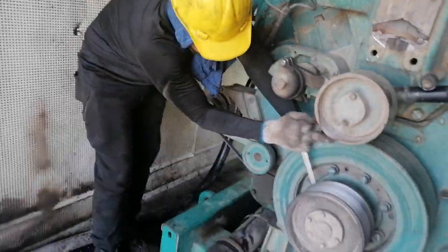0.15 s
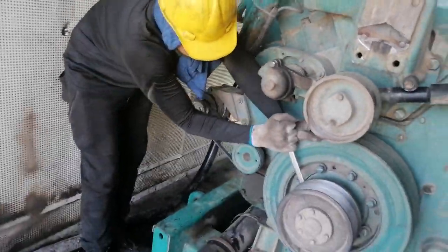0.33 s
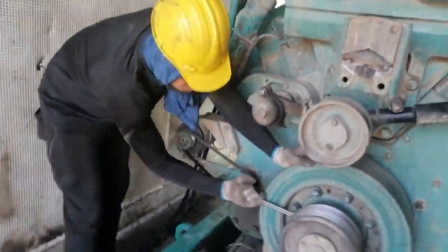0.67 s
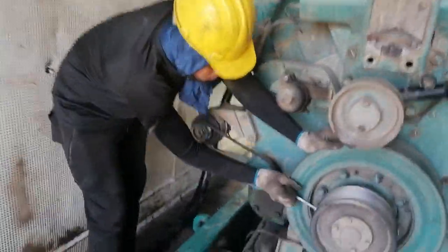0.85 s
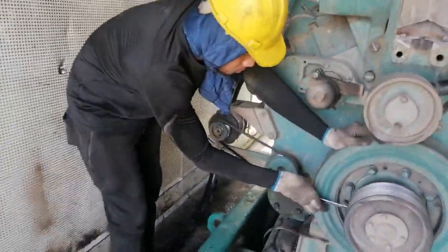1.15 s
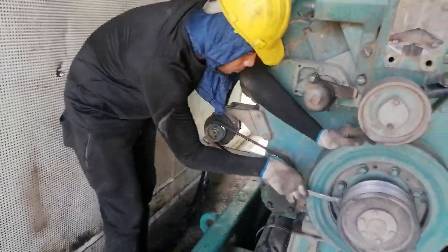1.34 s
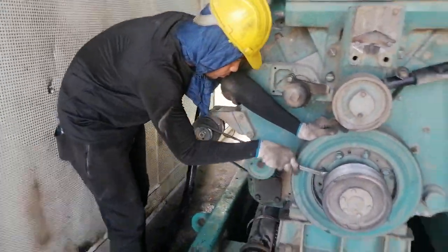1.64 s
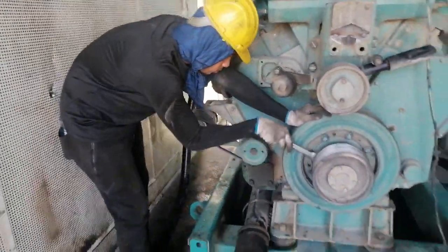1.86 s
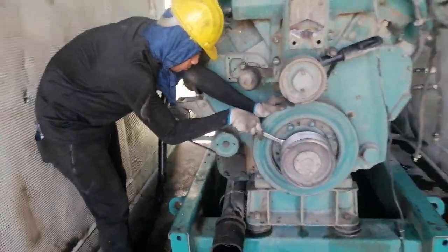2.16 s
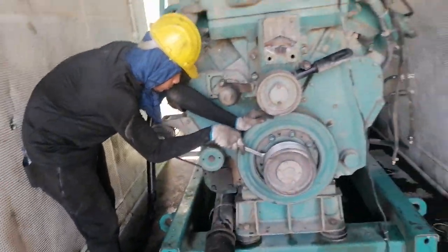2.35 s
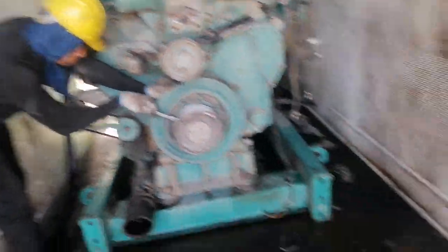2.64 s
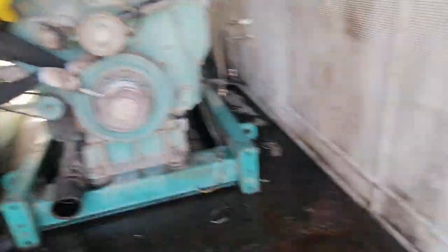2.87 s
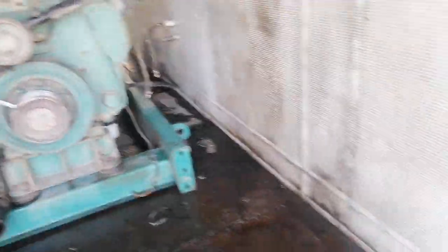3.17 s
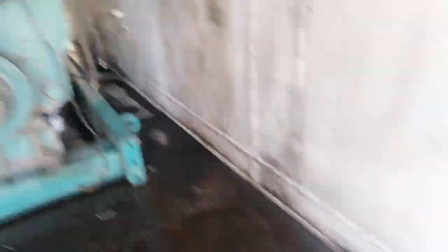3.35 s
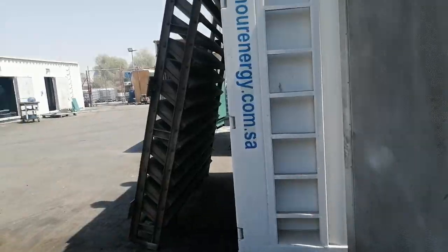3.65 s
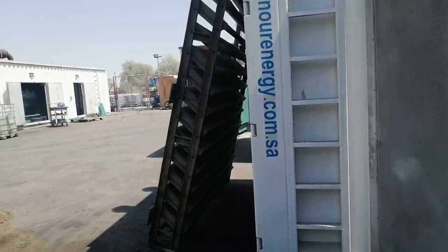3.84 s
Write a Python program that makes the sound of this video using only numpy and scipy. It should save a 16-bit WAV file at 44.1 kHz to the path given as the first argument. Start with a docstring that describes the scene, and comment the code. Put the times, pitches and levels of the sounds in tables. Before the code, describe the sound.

A spanner slips and clinks sharply on a large engine, then a louder windy yard cuts in.

```python
"""A spanner slips and clinks on a large idle engine: blows and a skid set its ringing tones going.
It happens inside a steel enclosure with yard noise (shaped noise), a low rumble and a wavering hum.
Then the place jumps outdoors: louder machinery, hiss, and wind on the microphone. A tick and rustles are added.
Only the left microphone works; the right channel holds its own faint noise.
A limiter turns both channels down after loud peaks."""
import sys
import numpy as np
from scipy import signal
from scipy.fft import rfft, irfft
from scipy.io import wavfile

SR = 44100
rng = np.random.default_rng(int(sys.argv[2]) if len(sys.argv) > 2 else 0)


def put_to_file(sound):
    """Save the sound as 16-bit audio at rate SR, in the file named by the first command-line argument."""
    columns = np.atleast_2d(sound).T  # one column per channel
    safe = np.clip(columns, -1, 1)
    whole_steps = np.round(safe * 32767)
    wavfile.write(sys.argv[1], SR, whole_steps.astype(np.int16))


N = 176400
TIME = np.arange(N) / SR   # seconds
OUTDOORS_START_S, CROSSFADE_S = 3.356, .003

# Drone of the yard heard inside. Each row: time in seconds, level in dB.
INSIDE_LEVEL = [(0, -37), (.3, -38), (.6, -35.5), (.84, -38.5), (.89, -44.5), (1.3, -42), (1.8, -41.5),
                (2.3, -44), (2.8, -44.5), (3.35, -45)]
# Colour of that drone. Each row: frequency in Hz, relative strength per Hz in dB.
INSIDE_COLOUR = [(12, -52), (20, -4.5), (54, -16.5), (124, -14.5), (259, -2), (280, -3), (312, -6),
                 (348, -10), (393, -8.5), (527, -13.5), (597, -15.5), (800, -20.5), (1040, -55),
                 (1760, -120)]
# Broad tones of the enclosure. Each row: frequency in Hz, filter width in Hz, level over the drone in dB.
INSIDE_TONES = [(89.2, 6.3, -14.5), (181.55, 15.5, -4.5), (351.2, 19.3, -6), (240, 30, -7),
                (1041.7, 17, -22.5)]
# Upper part of the yard noise inside. Each row: time in seconds, level in dB.
AIR_LEVEL = [(0, -47.5), (.3, -49), (.6, -48.5), (.84, -49), (.89, -56), (1.3, -56.5), (1.8, -56.5),
             (2.3, -57), (2.8, -55.5), (3.35, -56)]
# Colour of that upper part. Each row: frequency in Hz, relative strength per Hz in dB.
AIR_COLOUR = [(470, -25), (800, -0.5), (1030, -5), (1250, -10), (1420, -5.5), (1530, -12), (1750, -8.5),
              (1930, -12), (2300, -14.5), (2700, -11.5), (3020, -10.5), (4070, -24), (5220, -18),
              (7670, -23), (8680, -15.5), (10900, -32.5), (13700, -41.5), (14600, -37), (15600, -44)]
# Low rumble inside. Each row: time in seconds, level in dB.
RUMBLE_LEVEL = [(0, -43), (.5, -50.5), (.84, -55), (.89, -56), (1.3, -55.5), (1.7, -51.5), (2.1, -52.5),
                (2.5, -62), (2.9, -58), (3.35, -58)]
RUMBLE_HZ = (22, 133.5)
# The hum swells and sinks. Each row: time in seconds, level in dB before it is doubled.
HUM_LEVEL = [(0.8, -50.5), (0.82, -43), (0.91, -62), (0.97, -42.5), (0.99, -51.5), (1.12, -41),
             (1.23, -44.5), (1.3, -33), (1.37, -38.5), (1.4, -48), (1.48, -32.5), (1.54, -35.5),
             (1.63, -42.5), (1.72, -33.5), (1.86, -39), (1.94, -33), (1.99, -42.5), (2.09, -33),
             (2.13, -38.5), (2.21, -50), (2.33, -35), (2.42, -49), (2.45, -39), (2.51, -37.5),
             (2.57, -52.5), (2.65, -43.5), (2.72, -47), (2.74, -55), (2.83, -51), (2.87, -71), (2.9, -74),
             (2.92, -52), (3.01, -68), (3.04, -68), (3.08, -48), (3.11, -49), (3.14, -68), (3.19, -67),
             (3.21, -49), (3.26, -45), (3.31, -52), (3.35, -68)]
HUM_HZ, HUM_WANDER_HZ, HUM_FLUTTER_DB = 270, 1.5, .9   # middle pitch, then typical drift of pitch and level

# Base level of the roar outdoors. Each row: time in seconds, level in dB.
OUTSIDE_LEVEL = [(3.37, -46.5), (3.386, -46.5), (3.5, -46.5), (3.66, -46), (3.67, -49), (3.928, -48),
                 (3.97, -49.5)]
# Colour of the roar. Each row: frequency in Hz, relative strength per Hz in dB.
OUTSIDE_COLOUR = [(88, -11), (150, -4), (252, -11.5), (285, -4), (345, -2), (417, -16), (465, -31),
                  (672, -10.5), (895, -18.5), (1050, -15), (1260, -24.5), (1740, -20.5), (1890, -31),
                  (2110, -21), (2630, -26.5), (3360, -28), (3900, -43), (5070, -74), (8580, -120)]
OUTSIDE_OVER_DB = 17.5   # whole band of roar over the base level
# Machine tones outdoors. Each row: frequency in Hz, filter width in Hz, level over the base level in dB.
OUTSIDE_TONES = [(347.1, 10.6, 17), (391, 34, 8.5), (268, 24, 7.5), (768.6, 16, 2.5), (1027, 32, 2),
                 (972, 27, -2.5), (1131, 35, -1), (2107, 11, -5.5), (670, 39, 1.5)]
# Hiss outdoors. Each row: time in seconds, level in dB.
HISS_LEVEL = [(3.36, -48.5), (3.4, -47.5), (3.44, -48.5), (3.52, -46.5), (3.6, -48), (3.7, -51.5),
              (3.82, -52), (3.9, -52.5), (3.96, -52.5)]
# Colour of the hiss. Each row: frequency in Hz, relative strength per Hz in dB.
HISS_COLOUR = [(2500, -33), (3800, -6.5), (5100, -0.5), (6300, -6.5), (7600, -5.5), (8700, -1), (9800, -8),
               (11000, -20.5), (13000, -28), (15600, -45)]
# Wind on the microphone. Each row: time in seconds, level in dB before it is doubled.
WIND_LEVEL = [(3.37, -51), (3.424, -30), (3.448, -21), (3.502, -25.5), (3.544, -28.5), (3.68, -31.5),
              (3.694, -34.5), (3.832, -36.5), (3.9, -33), (3.92, -24.5), (3.956, -24.5), (4.0, -23.5)]
# Colour of the wind. Each row: frequency in Hz, relative strength per Hz in dB.
WIND_COLOUR = [(20, 5), (50, 2), (130, 4.5), (250, -0.5), (500, -10.5), (900, -58)]
WIND_LUMPS_DB = 1.5
# Strong wind brightens: band, its level when the wind table reads GUST_AT_DB, dB gained per dB of wind
GUST_HZ, GUST_DB, GUST_AT_DB, GUST_SLOPE = (250, 750), -36, -27.5, 1.6
# Single thumps of wind. Each row: start in seconds, starting height in dB, frequency in Hz.
BUFFETS = [(3.448, -10, 150), (3.543, -15, 150), (3.586, -16, 160), (3.629, -15, 140), (3.698, -14, 60),
           (3.74, -17, 70), (3.924, -14, 120), (3.96, -11, 140)]
BUFFET_CYCLES = 4.5   # cycles until a thump has died by 60 dB

# Soft rustles in the treble. Each row: middle in seconds, length in seconds, level in dB.
RUSTLES = [(.08, .06, -71), (0.222, .04, -72), (.61, .08, -66), (1.165, .05, -71), (2.238, .09, -70),
           (2.776, 0.042, -81), (3.59, 0.069, -62)]
RUSTLE_HZ, RUSTLE_FLICKER_DB = (7500, 13000), 2.0
TICK_S, TICK_DB = 2.854, -38.5   # a small dry tick; its rows are added to this level
# Tones of the tick. Each row: frequency in Hz, relative strength in dB, seconds to die by 60 dB.
TICK_TONES = [(5440, -13, 0.014), (6900, -7, .025), (8550, -1, .025), (8860, -2, 0.061), (8950, 1, .03),
              (9350, -6, .02), (12000, -24, .02)]

# Ringing tones (modes) of the spanner: the frequency of each in Hz.
SPANNER_HZ = [1140, 1320, 2435, 3700, 4180, 4330, 4800, 5150, 5549, 5660, 6210, 6345, 6378, 6540, 6800,
              7800, 8737, 9175, 9400, 9680, 10140, 10565, 10990, 12022, 13088, 13650, 14550, 15110]
# The same modes in order. Each row: seconds to die by 60 dB, then strength in dB when struck at the jaw,
# at the neck, at the shank, and when skidding.
SPANNER_MODES = [(0.048, -29, -11.5, -48, -3), (0.051, -21, -25, -49.5, -14), (0.038, -23, 5, -44, -7),
                 (0.04, -24, -17, -29, -18), (0.12, -18, -35, -12, -7.5), (.06, -20, -35, -28, -14),
                 (.04, -21, -40, -34, -17), (.04, -18, -35, -28, -20), (0.074, -10, -26, 5.5, -16),
                 (.16, -29, -40, -12, -30), (.05, -15, -40, -24, -16), (0.051, -21, -33, -36, -10),
                 (0.1, 5.5, -33, -10, -14), (0.054, -5, -39, -28, -20), (0.11, -15, -41, -28, -21),
                 (0.067, -33, -38, -12, -25), (0.11, -4.5, -34, -12, -3.5), (0.1, -9.5, -23, -18, -2),
                 (.06, -22, -30, -24, -14), (.07, -23, -32, -27, -18), (0.14, -13.5, -13, -18.5, -19),
                 (.12, -24, -31, -38, -27), (.06, -38, -31, -33, -25), (.1, -19, -16, -34, -19),
                 (0.079, -45, -7, -23, -28), (.05, -42, -30, -44, -40), (.07, -43, -35, -48, -50),
                 (.1, -42, -25, -50, -50)]
PLACES = ["jaw", "neck", "shank", "skid"]
# Blows. Each row: start in seconds, strength in dB, place struck, level of its crack in dB.
BLOWS = [(.783, -62, "shank", -45), (0.7972, -50, "shank", -52), (0.8056, -30.5, "neck", -48),
         (0.83, -43, "neck", -48), (.838, -38, "skid", -50), (0.8489, -15, "jaw", -23.5),
         (.852, -34, "neck", -51), (1.2, -60.5, "jaw", -58), (1.245, -62, "neck", -73),
         (1.282, -58, "skid", -68), (1.385, -62, "neck", -72), (1.557, -40.5, "shank", -50)]
# The jaw skids before the loud blow: start and end, strength at each, average clicks per second
SLIP_S, SLIP_DB, SLIP_PER_S = (.811, .848), (-48, -44), 1300
CRACK_HZ, CRACK_T60_S = (3780, 9050), 0.048
SWELL_T60_S = 0.01   # a ring swells briefly as the near walls answer
WALLS_DB, WALLS_T60_S, WALLS_START_S = -11, .1, .003   # steel walls scatter the spanner's sound

# Colour of the right channel's noise. Each row: frequency in Hz, relative strength per Hz in dB.
RIGHT_COLOUR = [(20, -0.5), (60, -4), (200, -12), (700, -21.5), (2000, -30), (3000, -29), (4000, -40),
                (5300, -32.5), (7500, -42), (15000, -35)]
RIGHT_DB = -75

SENSE_HZ = 90   # the limiter hears little below this
LIMIT_DB, LIMIT_SHARE = -15.5, 0.58   # threshold, and share of the excess that is taken off
RELEASE_DB_PER_S, ATTACK_S = 31.5, 0.0054   # fall of the held peak level, and smoothing of the ducking
PEAK_TOP = .5   # after the limiter, peaks are rounded toward this height
CUTOFF_HZ = 15800   # the top is 60 dB down from here up


def from_db(db):
    """Turn decibels into a plain multiplier."""
    return 10 ** (np.asarray(db) / 20)


def rms_one(x):
    """Scale a signal to an average strength (rms) of 1."""
    return x / np.sqrt(np.mean(x ** 2) + 1e-20)


def in_time(rows):
    """Draw straight lines in dB between the rows of a level table."""
    seconds, db = np.transpose(rows)
    return np.interp(TIME, seconds, db)


def decay_per_sample(t60):
    """Multiplier per sample for a sound that dies by 60 dB in t60 seconds."""
    return from_db(-60 / (t60 * SR))


def drift(rate_hz):
    """Slow random wandering with spread 1: noise smoothed twice, made at every 40th sample."""
    r = np.exp(-2 * np.pi * rate_hz * 40 / SR)
    noise = rng.standard_normal(N // 40 + 2002)
    slow = signal.lfilter([1], [1, -2 * r, r * r], noise)[2000:]   # skip the settling
    return np.interp(np.arange(N) / 40, np.arange(len(slow)), rms_one(slow))


def coloured(spectrum):
    """Noise shaped by a colour table, rms 1; it falls away steeply beyond both ends."""
    hz, db = np.transpose(spectrum)
    grid = np.maximum(np.fft.rfftfreq(N, 1 / SR), 1)
    shape = from_db(np.interp(np.log(grid), np.log(hz), db))
    shape = shape * np.minimum(grid / hz[0], 1) ** 4 * np.minimum(hz[-1] / grid, 1) ** 8
    return rms_one(irfft(rfft(rng.standard_normal(N)) * shape, N))


def tones(rows):
    """Noise passed twice through each narrow resonance."""
    out = 0
    for hz, width_hz, db in rows:
        b, a = signal.iirpeak(hz, hz / width_hz, SR)
        once = signal.lfilter(b, a, rng.standard_normal(N))
        out = out + from_db(db) * rms_one(signal.lfilter(b, a, once))
    return out


def band(edges_hz):
    """Noise kept between two frequencies, rms 1."""
    sos = signal.butter(2, edges_hz, "band", fs=SR, output="sos")
    return rms_one(signal.sosfilt(sos, rng.standard_normal(N)))


def click(seconds, db):
    """A single-sample knock in silence."""
    out = np.zeros(N)
    out[int(seconds * SR)] = from_db(db)
    return out


def ring(clicks, hz, t60):
    """Each click of height 1 sets off a dying sine that starts at height 1."""
    r, w = decay_per_sample(t60), 2 * np.pi * hz / SR
    return signal.lfilter([0, np.sin(w)], [1, -2 * r * np.cos(w), r * r], clicks + 1e-18)


def swell(clicks, hz, t60):
    """A ring that builds up over a few milliseconds by driving a second, short ring."""
    return 2 * (1 - decay_per_sample(SWELL_T60_S)) * ring(ring(clicks, hz, t60), hz, SWELL_T60_S)


def right_noise():
    """The right channel's own faint, steady noise."""
    return from_db(RIGHT_DB) * coloured(RIGHT_COLOUR)


def hum():
    """One strong sine whose pitch and level waver."""
    phase = 2 * np.pi * np.cumsum(HUM_HZ + HUM_WANDER_HZ * drift(6.9)) / SR
    level = from_db(in_time(HUM_LEVEL) + HUM_FLUTTER_DB * drift(45))
    return 2 * np.sqrt(2) * level * np.sin(phase)   # root 2 turns rms into sine height


def enclosure():
    """Yard noise through the walls, with broad tones, a rumble and the hum."""
    drone = from_db(in_time(INSIDE_LEVEL)) * (coloured(INSIDE_COLOUR) + tones(INSIDE_TONES))
    air = from_db(in_time(AIR_LEVEL)) * coloured(AIR_COLOUR)
    rumble = from_db(in_time(RUMBLE_LEVEL)) * band(RUMBLE_HZ)
    return drone + air + rumble + hum()


def wind_on_microphone():
    """Lumpy low noise, a brighter band when the wind is strong, and thumps that ring briefly."""
    level_db = in_time(WIND_LEVEL)
    wind = 2 * from_db(level_db + WIND_LUMPS_DB * drift(27)) * coloured(WIND_COLOUR)
    gusts = from_db(GUST_DB + GUST_SLOPE * (level_db - GUST_AT_DB)) * band(GUST_HZ)
    buffets = sum(ring(click(s, db), hz, BUFFET_CYCLES / hz) for s, db, hz in BUFFETS)
    return wind + gusts + buffets


def yard():
    """Outdoors: the machinery's roar and tones, hiss, and wind."""
    machinery = from_db(OUTSIDE_OVER_DB) * coloured(OUTSIDE_COLOUR) + tones(OUTSIDE_TONES)
    roar = from_db(in_time(OUTSIDE_LEVEL)) * machinery
    hiss = from_db(in_time(HISS_LEVEL)) * coloured(HISS_COLOUR)
    return roar + hiss + wind_on_microphone()


def rustles():
    """Treble noise that swells softly and flickers."""
    level = sum(from_db(db) * np.exp(-(2 * (TIME - s) / length) ** 2) for s, length, db in RUSTLES)
    return level * band(RUSTLE_HZ) * from_db(RUSTLE_FLICKER_DB * drift(60))


def tick():
    """One knock rings a few short, high tones."""
    return sum(swell(click(TICK_S, TICK_DB + db), hz, t60) for hz, db, t60 in TICK_TONES)


def walls(x):
    """The dry sound plus a short dense tail of reflections, made from dying noise."""
    t = np.arange(SR // 4) / SR
    tail = rng.standard_normal(len(t)) * from_db(-60 * t / WALLS_T60_S) * (t > WALLS_START_S)
    tail = tail / np.sqrt(np.sum(tail ** 2))
    return x + from_db(WALLS_DB) * signal.fftconvolve(x, tail)[:N]


def skid():
    """Clicks of random height at random moments as the jaw slips, growing stronger."""
    sliding = (TIME > SLIP_S[0]) * (TIME < SLIP_S[1])
    hits = (rng.random(N) < SLIP_PER_S / SR) * sliding
    return hits * rng.standard_normal(N) * from_db(np.interp(TIME, SLIP_S, SLIP_DB))


def spanner():
    """Blows at three places and skidding ring the same modes; each blow adds a crack of noise."""
    strikes, cracks = np.zeros((len(PLACES), N)), np.zeros(N)
    for s, db, place, crack_db in BLOWS:
        strikes[PLACES.index(place)] += click(s, db)
        cracks += click(s, crack_db)
    strikes[PLACES.index("skid")] += skid()
    ringing = 0
    for hz, (t60, *place_db) in zip(SPANNER_HZ, SPANNER_MODES):
        drive = from_db(place_db) @ strikes   # the place decides how strongly this mode is struck
        ringing = ringing + swell(drive, hz, t60)
    crack_level = signal.lfilter([1], [1, -decay_per_sample(CRACK_T60_S)], cracks + 1e-18)
    return ringing + band(CRACK_HZ) * crack_level


def scene():
    """Indoors, then outdoors, on the left; faint noise on the right."""
    outdoors = np.clip((TIME - OUTDOORS_START_S) / CROSSFADE_S, 0, 1)
    indoors = enclosure() + walls(spanner())
    left = (1 - outdoors) * indoors + outdoors * yard() + rustles() + tick()
    return np.array([left, right_noise()])


def record(dry):
    """The limiter follows the left peaks and ducks both channels; then peaks are rounded, the top is cut."""
    sensed = signal.lfilter(*signal.butter(1, SENSE_HZ, "high", fs=SR), dry[0])
    level_db = 20 * np.log10(np.abs(sensed) + 1e-9)
    # hold each peak, then let it fall at a steady rate
    held_db = np.maximum.accumulate(level_db + RELEASE_DB_PER_S * TIME) - RELEASE_DB_PER_S * TIME
    wanted_db = LIMIT_SHARE * np.maximum(held_db - LIMIT_DB, 0)
    r = np.exp(-1 / (ATTACK_S * SR))
    duck_db = signal.lfilter([1 - r], [1, -r], wanted_db)
    rounded = PEAK_TOP * np.tanh(dry * from_db(-duck_db) / PEAK_TOP)
    top_cut = signal.cheby2(12, 60, CUTOFF_HZ, fs=SR, output="sos")
    return signal.sosfilt(top_cut, rounded)


dry = scene()
out = record(dry)
put_to_file(out)
```